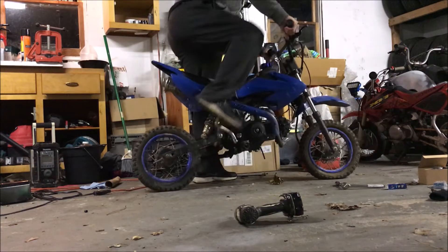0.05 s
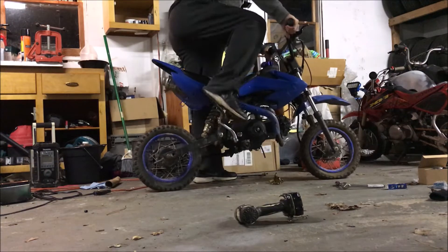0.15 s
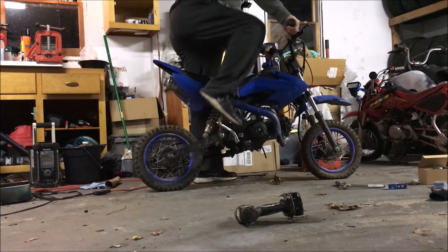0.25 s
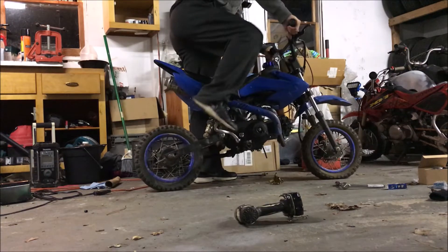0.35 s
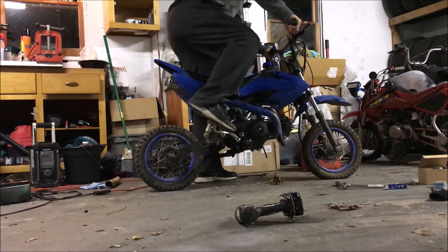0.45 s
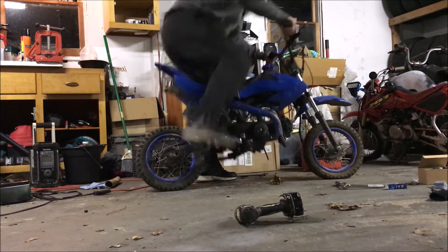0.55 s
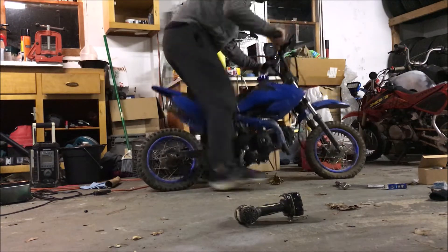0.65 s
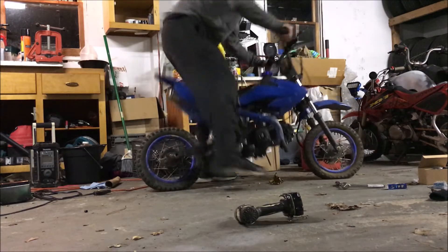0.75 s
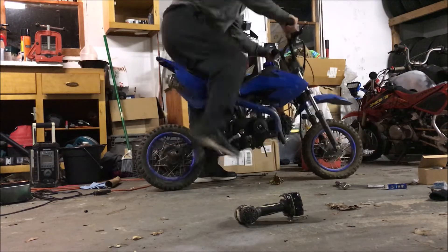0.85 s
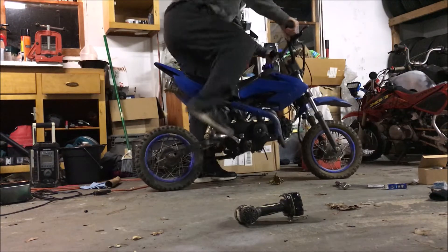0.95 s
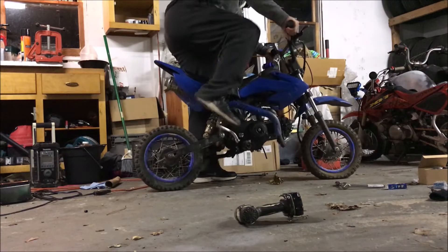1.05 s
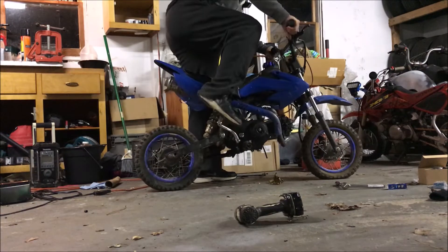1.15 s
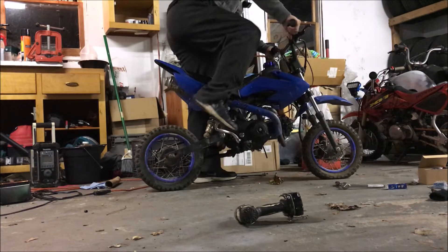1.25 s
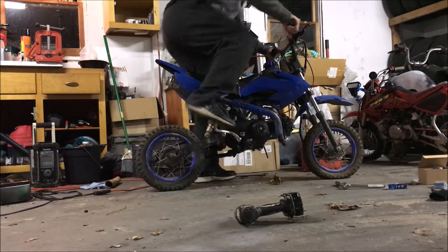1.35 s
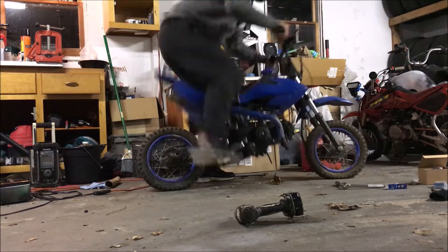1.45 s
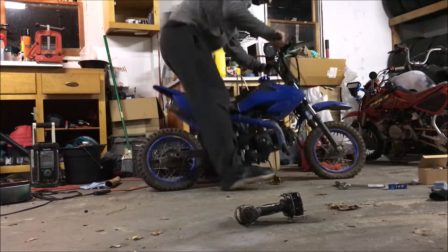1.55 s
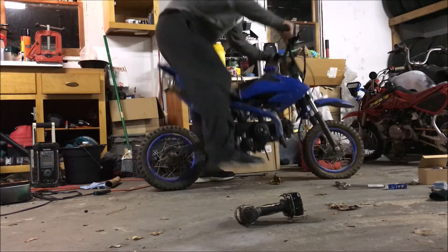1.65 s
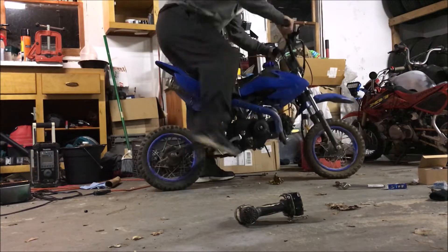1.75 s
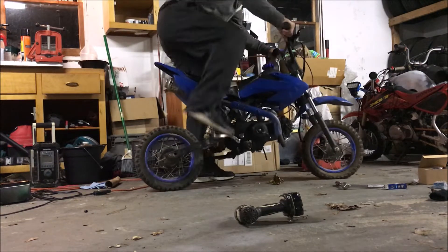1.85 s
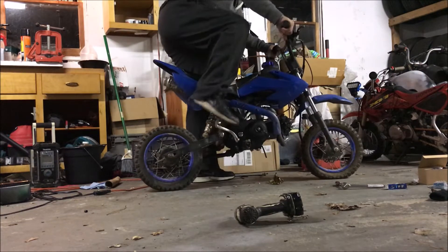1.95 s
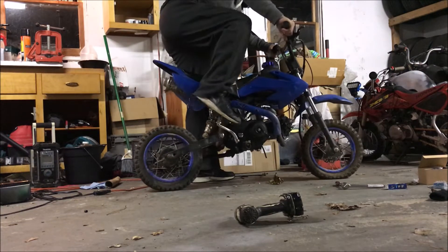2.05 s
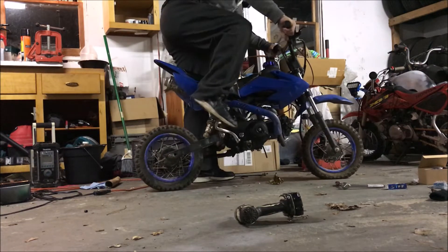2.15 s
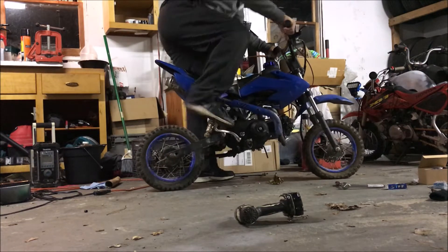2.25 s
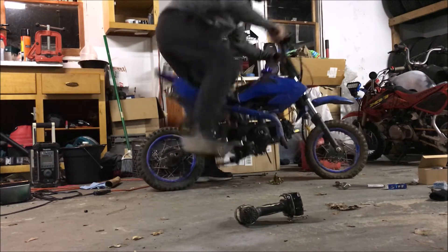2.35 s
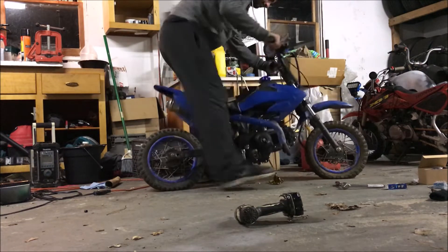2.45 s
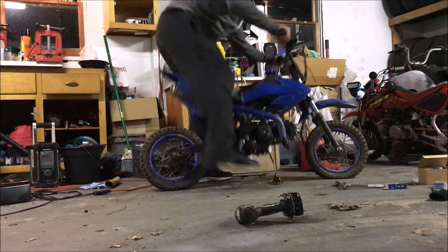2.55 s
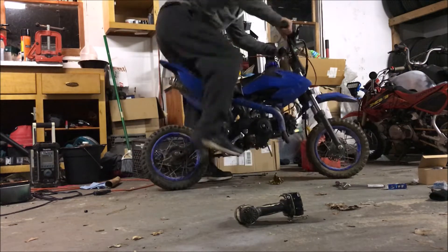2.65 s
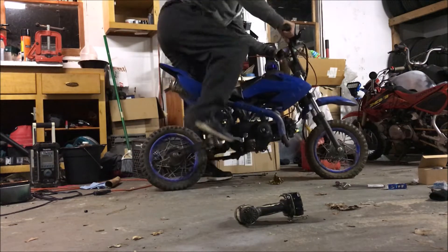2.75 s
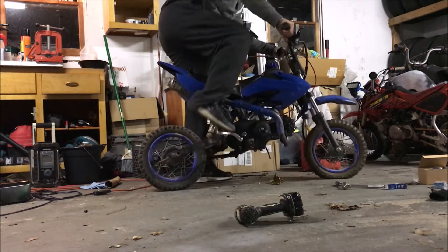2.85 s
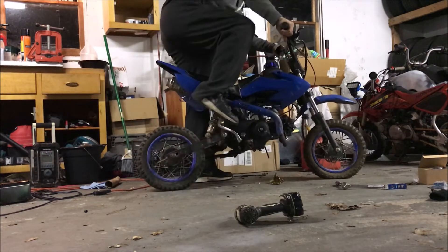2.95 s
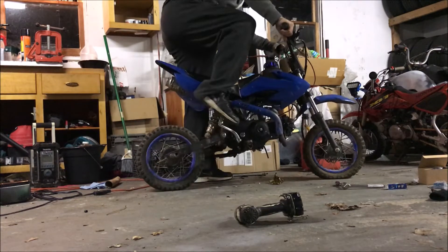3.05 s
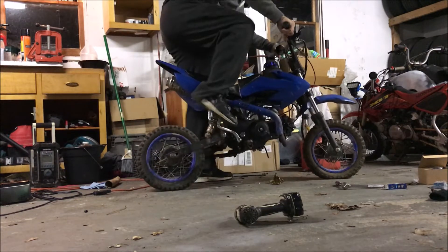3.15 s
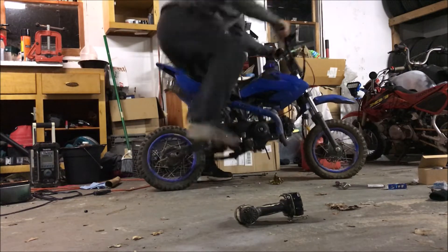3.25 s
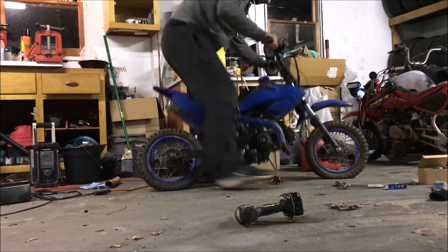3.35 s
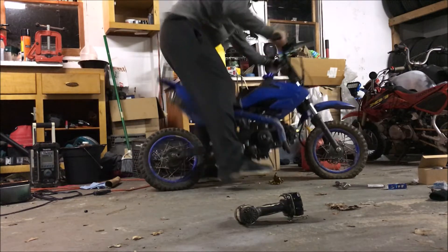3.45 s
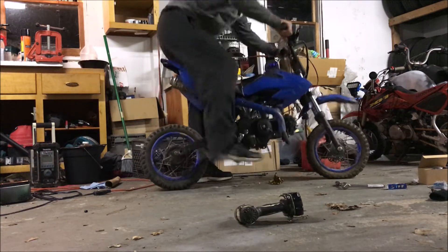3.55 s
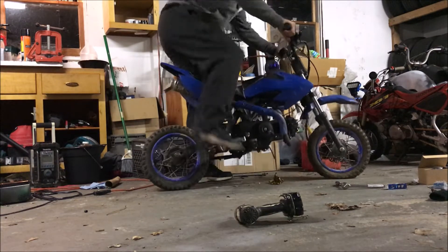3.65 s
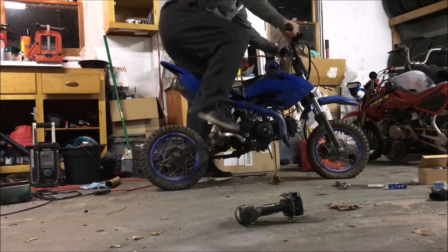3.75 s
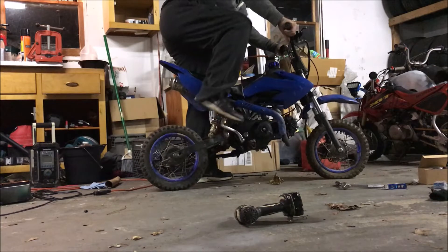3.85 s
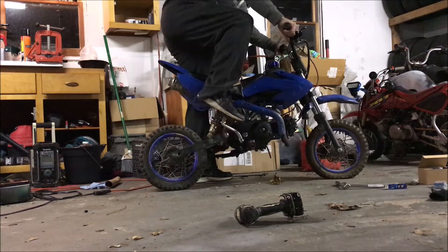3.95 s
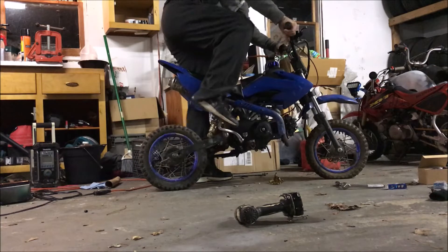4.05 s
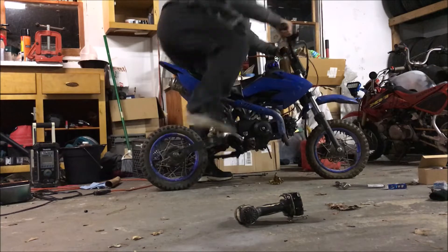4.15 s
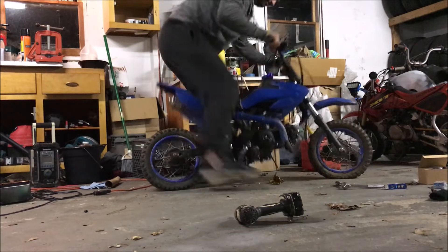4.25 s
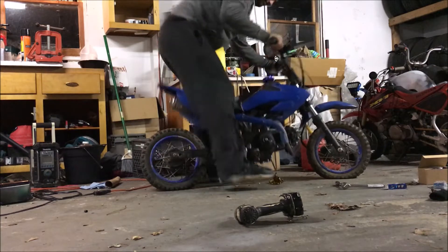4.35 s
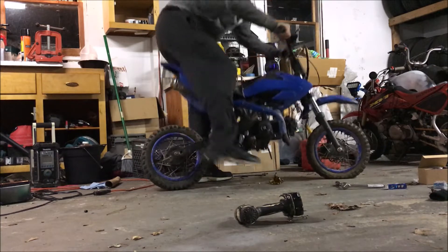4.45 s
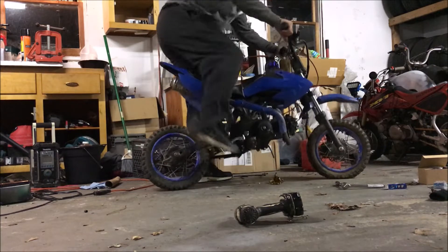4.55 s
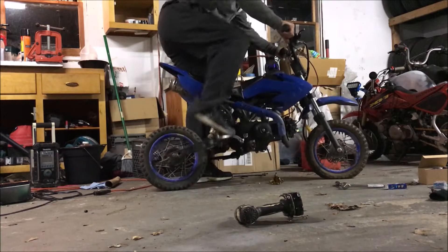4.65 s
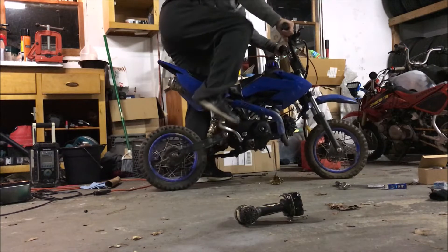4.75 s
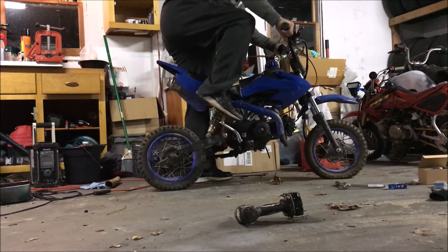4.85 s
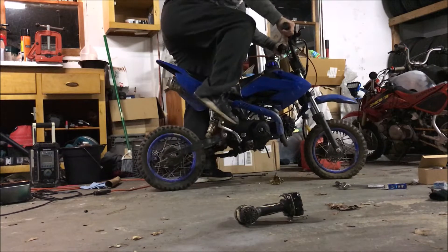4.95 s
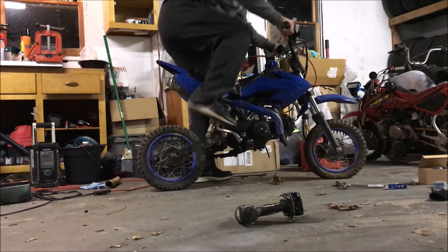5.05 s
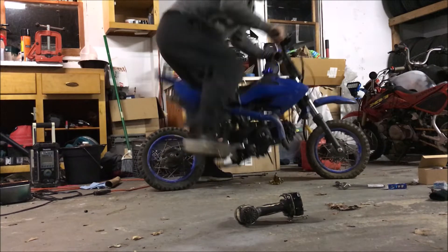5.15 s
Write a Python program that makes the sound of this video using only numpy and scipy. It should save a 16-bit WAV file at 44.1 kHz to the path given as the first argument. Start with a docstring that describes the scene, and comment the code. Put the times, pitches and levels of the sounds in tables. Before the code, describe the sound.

Repeated kick-starter strokes clack and grind, the engine chuffs and squeaks, then the lever ratchets back, ringing off bare garage walls.

```python
"""A small single-cylinder motorcycle is kicked over in a garage: one kick dies away, five more follow, it never catches.
Lever and pawl click and knock (filtered noise bursts, ringing steel modes); gears grind and the chain rattles
(shaped noise, tiny ticks); the piston gulps air up to three times a kick (pulse, air modes, noise puff).
Dry metal squeaks (gliding partials, scraping noise) and the lever ratchets back. Bare walls ring after it
(decaying noise as reverberation), over a faint hum (sines) and a low rumble (noise)."""
import sys
import numpy as np
from scipy import signal
from scipy.io import wavfile

SR = 44100
rng = np.random.default_rng(int(sys.argv[2]) if len(sys.argv) > 2 else 0)


def int16_out(signal):
    """Quantize to a 16-bit WAV file."""
    q = np.round(np.clip(np.atleast_2d(signal).T, -1, 1) * 32767)
    wavfile.write(sys.argv[1], SR, q.astype(np.int16))


N = 230053
T = np.arange(N) / SR
EDGE_HZ = 15500  # top of the band


def amp(db):
    """Decibels to gain."""
    return 10 ** (np.asarray(db) / 20)


def evened(x):
    """Scales to an rms of one."""
    return x / np.sqrt(np.mean(x ** 2) + 1e-20)


def read(points, hz):
    """Reads a spectrum on a log-frequency axis."""
    point_hz, value = np.transpose(points)
    return np.interp(np.log(hz + 1), np.log(point_hz + 1), value)


def add(mix, start_s, sound):
    """Mixes a sound in at start_s, which may lie before zero."""
    start = round(start_s * SR)
    sound = sound[max(-start, 0):]
    part = mix[max(start, 0):][:len(sound)]
    part += sound[:len(part)]


def coloured(x, points, size=2048):
    """Minimum-phase filter with the given spectrum: causal, so that clicks keep their sharp front."""
    bin_hz = abs(np.fft.fftfreq(size, 1 / SR))
    log_gain = np.log(amp(read(points, bin_hz)))
    spectrum = np.exp(np.conj(signal.hilbert(log_gain)))
    taps = np.fft.ifft(spectrum).real
    return signal.oaconvolve(x, taps[:size // 2])[:len(x)]


def wander(count, rate_hz):
    """Smooth random motion of rms about one: straight lines between normal draws."""
    at = np.arange(count) * rate_hz * 2 / SR
    knots = rng.standard_normal(2048)
    return 1.2 * np.interp(at, np.arange(len(knots)), knots)


def turning():
    """Gains of grind and rattle: a kick loads the gears, the engine coasts to a stop, the lever returns."""
    # Each row: foot presses in s, hardest push in s, engine stops in s, lever is home in s,
    # relative push level in dB, relative chain rattle level in dB.
    kicks = [(-.15, -0.028, 0.017, .42, -25.5, -35), (0.57, 0.709, 0.95, 1.247, -27.5, -34.5),
             (1.418, 1.557, 1.774, 2.03, -21.5, -36), (2.356, 2.467, 2.76, 2.788, -27, -35),
             (3.233, 3.381, 3.694, 3.94, -24, -35.5), (4.219, 4.344, 4.59, 4.86, -25, -35)]
    push_rise_db_per_s, push_fall_db_per_s = 167.5, 131
    coast_db, coast_fall_db_per_s = -34.5, 8  # the engine turns freely
    take_up_s = 0.019  # slack of the lever
    spin_up_db_per_s, settle_db_per_s = 119, 160.5  # before the hardest push, after the stop
    return_grind_db, return_rattle_db, return_fall_db_per_s = -41, -45.5, 25  # lever ratchets back up
    grind, rattle = np.zeros(N), np.zeros(N)
    for press_s, hardest_s, stop_s, home_s, push_db, rattle_db in kicks:
        t = np.arange(press_s, home_s, 1 / SR)
        before_s = np.maximum(hardest_s - t, 0)
        after_s = np.maximum(t - hardest_s, 0)
        stopped_s = np.maximum(t - stop_s, 0)
        push = amp(push_db - push_rise_db_per_s * before_s - push_fall_db_per_s * after_s)
        spin = amp(-spin_up_db_per_s * before_s - settle_db_per_s * stopped_s)
        coast = spin * amp(coast_db - coast_fall_db_per_s * after_s)
        back = (t > stop_s) * amp(-return_fall_db_per_s * stopped_s)
        meshed = np.minimum((t - press_s) / take_up_s, 1)
        load = np.maximum(np.maximum(push, coast), amp(return_grind_db) * back)
        shake = np.maximum(amp(rattle_db) * spin, amp(return_rattle_db) * back)
        add(grind, press_s, meshed * load)
        add(rattle, press_s, meshed * shake)
    return grind, rattle


def gears(grind_gain, rattle_gain, grind_db=-2, rattle_db=-3.0, teeth_hz=150, tooth_depth=0.11,
          ticks_per_s=900, spread_db=2.5, hiss=0.46):
    """Teeth grind as they mesh, and the chain rattles in many tiny ticks of uneven size."""
    # Spectra of grind and chain rattle. Each row: frequency in Hz, relative level in dB per Hz.
    grind_spectrum = [(40, -14.5), (110, 4.5), (200, 2.5), (400, 1.5), (650, 4.5), (850, -1), (1500, -2),
                      (2500, -7), (4000, -17), (9000, -47)]
    rattle_spectrum = [(500, -11), (1800, -30), (3400, 9.5), (4400, 5), (5600, 9), (7000, -2.5), (9000, 1),
                       (10700, -16), (12300, -0.5), (13700, -2.5), (14800, -10), (16000, -36)]
    mesh_hz = teeth_hz * (1 + 0.19 * wander(N, 6.7))
    mesh = 1 + tooth_depth * np.sin(2 * np.pi * np.cumsum(mesh_hz) / SR)
    grind = coloured(rng.standard_normal(N) * mesh * amp(3.06 * wander(N, 45)), grind_spectrum)
    sizes = amp(spread_db * np.minimum(rng.exponential(1, N), 4)) * rng.choice([-1, 1], N)
    ticks = evened(sizes * (rng.random(N) < ticks_per_s / SR))
    ticks = ticks + hiss * rng.standard_normal(N)
    rattle = coloured(ticks * mesh * amp(1.2 * wander(N, 50)), rattle_spectrum)
    return amp(grind_db) * grind_gain * evened(grind) + amp(rattle_db) * rattle_gain * evened(rattle)


def gulps(suck_db=2, suck_s=0.00056, puff_db=-12, puff_s=0.024, low_cut_hz=36):
    """A valve opens on the cylinder: a sharp suck, a puff, and the air rings on."""
    # Each row: start in s, relative level in dB.
    gulp_rows = [(-.012, -19.5), (0.6976, -16), (0.8043, -15.5), (1.6083, -14), (1.7148, -19.5),
                 (2.4289, -17.5), (2.5301, -12), (2.6347, -15), (3.3642, -15.5), (3.4648, -14.5),
                 (3.5823, -18.5), (4.3338, -15.5), (4.4278, -15), (4.5402, -19.5)]
    # Air passage first, then the garage's standing waves.
    # Each row: mean frequency in Hz, relative level in dB, t60 in s, build-up time in s.
    air_modes = [(72.3, -1, 0.17, 0.00086), (56.8, -17, 0.83, 0.017), (91.2, -5, 0.31, 0.017),
                 (80.2, -12.5, 0.69, 0.01), (113.4, -14, 0.48, 0.011), (171.8, -18, 0.44, 0.0021),
                 (221.4, -18, 0.29, 0.0037), (333, -17, 0.2, 0.0036), (383, -23.5, 0.57, 0.0033)]
    puff_spectrum = [(60, -7.5), (160, 0.5), (320, -2.5), (680, -6), (1100, -18.0), (5000, -32.5)]  # Hz, dB
    out, puffs, t = np.zeros(N), np.zeros(N), T[:SR * 2 // 5]
    lead_s = 1 / 500  # room for the front half of the suck
    age_s = np.maximum(t - lead_s, 0)
    suck = -amp(suck_db) * np.exp(-((t - lead_s) / suck_s) ** 2)
    rings = [(hz, amp(level_db - 60 * age_s / t60_s) * (1 - np.exp(-age_s / rise_s)))
             for hz, level_db, t60_s, rise_s in air_modes]
    for start_s, db in gulp_rows:
        ring = sum(fade * np.sin(2 * np.pi * hz * rng.normal(1, 0.013) * age_s + np.pi / 8)
                   for hz, fade in rings)
        add(out, start_s - lead_s, amp(db) * (suck + ring))
        add(puffs, start_s, amp(db + puff_db) * np.exp(-t / puff_s))
    air = evened(coloured(rng.standard_normal(N), puff_spectrum))
    low_cut = signal.butter(2, low_cut_hz, "high", fs=SR)
    return signal.lfilter(*low_cut, out + puffs * air)


def clacks(rattle_gain, level_db=1, ring_db=-26, chatter_db=-13, chatter_s=0.014, body_hz=1100,
           treble_hz=7000, rise_s=0.00068, tick_treble_db=2, tick_s=.0014):
    """Steel meets steel: a crack, a short chatter of loose parts, and the lever's ring."""
    # Light clicks of pawl and lever, then heavy knocks that shake the frame.
    # Each row: start in s, relative level in dB, extra treble in dB.
    clicks = [(.098, -16, 0.5), (.607, -22.5, -4), (.6233, -20, 9), (0.767, -15, 4), (1.062, -26, -4),
              (1.0964, -19.5, 2), (1.468, -17.5, -4), (1.487, -21, 5), (1.579, -12, 8), (1.6722, -11, 1),
              (1.928, -21.5, 1), (1.993, -16.5, -1.5), (2.381, -20, -4), (2.395, -23.5, 7),
              (2.498, -22.5, 10.5), (2.567, -13.5, 0.5), (2.841, -22.5, 0.5), (3.311, -14.5, -4),
              (3.33, -23, 8), (3.422, -25, 14), (3.683, -24, 8), (3.806, -24.5, 3.5), (3.879, -26.5, 5),
              (4.27, -18, 0), (4.853, -20, -2.5), (5.203, -16.5, 0)]
    knocks = [(0.076, -35, 10), (.157, -24, -4), (.672, -16.5, 5.5), (1.535, -17.5, 9), (1.804, -22, 4.5),
              (2.444, -20, 8), (2.529, -23.5, -9), (2.922, -30.5, -9), (3.38, -18, 7), (4.049, -29.5, -3),
              (4.133, -38, -28.5), (4.237, -32.5, -1.5), (4.332, -20, 5), (5.16, -36.5, -9)]
    # Starter steel. Each row: mean frequency in Hz, relative level in dB, t60 in s.
    steel_modes = [(2385, -8.5, 0.2), (3210, 5.5, 0.062), (3290, -2, 0.042), (3640, 4, 0.059),
                   (4100, 0.5, 0.043), (5560, 1, 0.07), (6800, -16.5, .04), (8300, -15, 0.062),
                   (12200, -4, 0.028), (13800, -17, 0.064)]
    # Spectrum of the contacts. Each row: frequency in Hz, gain in dB.
    contact_spectrum = [(60, -19.5), (250, -10), (650, 0.5), (1300, -3), (2200, -3), (3500, 3),
                        (6000, -2.5), (8500, -5.5), (10700, -11), (13400, -1), (14800, -17), (16000, -18)]
    click_body_db, click_s = -4, 0.0029  # extra low body, decay of the contact
    knock_body_db, knock_s = 15.5, 0.0027
    ticks_per_s, tick_db, tick_spread_db = 36, 9, 7.5  # random ticks of loose parts, dB above the rattle gain
    out, t = np.zeros(N), T[:SR // 12]
    low = signal.butter(2, body_hz, fs=SR)
    band = signal.butter(2, [body_hz, treble_hz], "band", fs=SR)
    high = signal.butter(2, treble_hz, "high", fs=SR)
    fades = [(hz, amp(mode_db + ring_db - 60 * t / t60_s)) for hz, mode_db, t60_s in steel_modes]
    ticking = (rng.random(N) < ticks_per_s / SR) & (rattle_gain > 0)
    tick_levels_db = 20 * np.log10(rattle_gain + 1e-9) + tick_db + tick_spread_db * rng.standard_normal(N)
    blows = [(*row, click_body_db, click_s) for row in clicks]
    blows += [(*row, knock_body_db, knock_s) for row in knocks]
    blows += [(start_s, db, tick_treble_db, 0, tick_s)
              for start_s, db in zip(T[ticking], tick_levels_db[ticking])]
    for start_s, db, treble_db, body_db, length_s in blows:
        weight = np.sqrt(length_s / 0.0011)  # a longer contact hands over more energy
        decay = np.exp(-t / length_s) + weight * amp(chatter_db) * np.exp(-t / chatter_s)
        force = rng.standard_normal((3, len(t))) * decay
        crack = amp(body_db) * signal.lfilter(*low, force[0])
        crack = crack + signal.lfilter(*band, force[1])
        crack = crack + amp(treble_db) * signal.lfilter(*high, force[2])
        ring = sum(fade * rng.uniform(-1.45, 1) * np.sin(2 * np.pi * hz * rng.normal(1, 0.018) * t)
                   for hz, fade in fades)
        add(out, start_s, amp(db + level_db) * (crack + weight * ring) * (1 - np.exp(-t / rise_s)))
    return coloured(out, contact_spectrum)


def squeaks(level_db=0.5, hold=.45, flat_start=0.0782, sag_curve=1.194, grip=0.13, swell_db=11, fade_db=20,
            upper_fall_db=-2.2, jitter=0.065, jitter_hz=600, flutter=0.68, end_rough=0.41, scrape_db=-6):
    """Dry metal sticks and slips: the tone climbs and swells until the grip breaks, sags, fades into a scrape."""
    # Each row: start in s, length in s, top pitch in Hz, share of the pitch lost at the end,
    # base roughness 0-1, relative level in dB, extra level of the partials above the third in dB.
    squeak_rows = [(0.253, .054, 10040, 0.09, .25, -42, 0), (0.618, 0.052, 1129, 0.06, 0.17, -29, -1.5),
                   (0.895, 0.026, 1157, 0.05, 0.1, -31.5, 3), (1.819, .029, 1790, 0.074, 0.47, -20.5, -24),
                   (1.827, 0.02, 2185, .22, 0, -19, -26), (2.736, 0.025, 2334, 0.3347, 0.46, -13, -8.5),
                   (3.4293, 0.011, 2676, 0.22, 0.63, -8.5, -8), (3.533, 0.015, 2667, 0.36, 0.3, -11, -4),
                   (3.7085, .033, 2100, .3, 0.09, -12, -10.5), (4.392, 0.013, 2778, 0.25, 0.58, -10, -8.5),
                   (4.4905, .017, 2585, 0.31, 0, -9.5, -1), (4.654, 0.038, 2206, 0.31, 0.17, -12, -9)]
    # Radiation of the partials by the metal. Each row: frequency in Hz, gain in dB.
    radiation = [(1100, -1), (1680, -3), (2130, -11), (2360, -2.5), (2650, -0.5), (3300, -3), (4350, 3),
                 (4800, -7.5), (5300, -2.5), (5850, -3.5), (6400, 1), (7400, -2.5), (8000, -3), (8700, 3.5),
                 (10200, -5.5), (12000, 1), (15000, -3.5)]
    # Spectrum of the scrape. Each row: frequency in Hz, relative level in dB per Hz.
    scrape_spectrum = [(500, -20.5), (1500, 2), (2400, -21), (3300, 3), (4200, 1), (5200, -11), (8000, -1),
                       (10700, -10), (13500, 3), (16000, -22)]
    out, sliding = np.zeros(N), np.zeros(N)
    for start_s, length_s, top_hz, sag, rough, db, upper_db in squeak_rows:
        count = int(length_s * SR)
        u = np.linspace(0, 1, count)  # share of the squeak gone by
        slowing = np.maximum((u - hold) / (1 - hold), 0)
        climb = flat_start * np.maximum(1 - u / hold, 0) ** 2
        pitch_hz = top_hz * (1 - climb - sag * slowing ** sag_curve)
        unrest = rough + end_rough * slowing
        turns = np.cumsum(pitch_hz * (1 + jitter * unrest * wander(count, jitter_hz))) / SR
        partials_db = [0, 0, 0] + [upper_db + upper_fall_db * k * top_hz / 2000 for k in range(10)]
        tone = 0
        for k, partial_db in enumerate(partials_db, 1):
            gain = amp(db + partial_db + read(radiation, k * pitch_hz))
            gain = gain * (1 + flutter * unrest * wander(count, jitter_hz))
            wave = np.sin(2 * np.pi * (k * turns + rng.random()))
            tone = tone + gain * wave * (k * top_hz < EDGE_HZ)
        loss_db = np.maximum(swell_db * (1 - 2 * u), fade_db * (u - .5))
        pressure = amp(level_db - loss_db) * np.minimum(np.minimum(u, 1 - u) / grip, 1)
        add(out, start_s, tone * pressure)
        add(sliding, start_s, np.std(tone) * pressure * (rough + slowing))
    scrape = evened(coloured(rng.standard_normal(N), scrape_spectrum))
    return out + amp(scrape_db) * sliding * scrape


def garage(x, first_s=0.0055, early_db=3.5, early_s=0.15):
    """Dense reflections, strongest from the near floor and walls, each band dying at its own speed."""
    # Each row: frequency in Hz, t60 in s ahead of the early emphasis.
    room_t60 = [(80, 0.24), (260, 0.08), (700, 1.1), (2000, 0.6553), (4500, 0.5), (8000, 0.37),
                (13000, 0.35)]
    # Each row: frequency in Hz, relative level of the reverberation in dB.
    room_wet = [(30, -6.5), (70, -4), (200, 1), (700, -2.5), (2500, 4.5), (5000, 0.5), (8000, -1.5),
                (14000, -0.5)]
    hz, t, z = signal.stft(rng.standard_normal(SR), SR, nperseg=256)
    t60_s = read(room_t60, hz)[:, None]
    decay = amp(read(room_wet, hz)[:, None] - 60 * t / t60_s)
    z *= decay * np.sqrt(2 * np.log(1000) / (t60_s * SR))  # even energy whatever the t60
    tail = signal.istft(z, SR, nperseg=256)[1][:SR]
    early = amp(early_db * (np.exp(-T[:SR] / early_s) - 1.5))
    tail *= (T[:SR] > first_s) * early
    return signal.fftconvolve(x, tail)[:N]


def background(floor_db=-52):
    """A distant motor hums, as unsteady sines, over the low rumble of the building, as shaped noise."""
    # Each row: mean frequency in Hz, rms level in dB.
    hum_tones = [(86.1, -55.5), (172.3, -57.5), (242.2, -70)]
    # Spectrum of the rumble. Each row: frequency in Hz, relative level in dB per Hz.
    floor_spectrum = [(20, -33.5), (36, -10), (52, 2), (75, -8.5), (115, -4.5), (200, -11.5), (400, -23.5),
                      (1000, -25), (3000, -28), (8000, -44.5), (15000, -42)]
    hum = sum(amp(db) * np.sqrt(2) * np.sin(2 * np.pi * hz * T + 0.24 * wander(N, 2)) for hz, db in hum_tones)
    rumble = evened(coloured(rng.standard_normal(N), floor_spectrum, size=8192))
    return hum + amp(floor_db) * rumble


def scene(squeak_wet_db=-4, casing_db=-1):
    """The motorcycle in its garage; the engine casing throws the squeaks' middle tones at the walls."""
    # Each row: frequency in Hz, gain of the casing in dB.
    casing_spectrum = [(1000, -24.5), (2000, -5.5), (2450, 8.5), (2750, -5), (3100, -1), (3600, 1),
                       (4100, 3), (4700, -12), (8000, -8.5), (15000, -19.5)]
    grind_gain, rattle_gain = turning()
    floor, squeak = background(), squeaks()
    engine = gulps() + gears(grind_gain, rattle_gain) + clacks(rattle_gain)
    walls = garage(engine + amp(squeak_wet_db) * squeak)
    walls = walls + amp(casing_db) * garage(coloured(squeak, casing_spectrum))
    return (engine + squeak + walls + floor)[None]


def record(dry):
    """Clips at full scale, then low-passes at the band edge."""
    taps = signal.firwin(255, EDGE_HZ, window=("kaiser", 8), fs=SR)
    return signal.oaconvolve(np.clip(dry, -1, 1), taps[None], "same")


dry = scene()
out = record(dry)
int16_out(out)
```